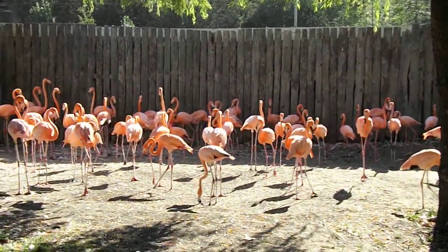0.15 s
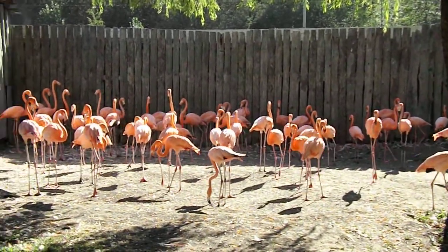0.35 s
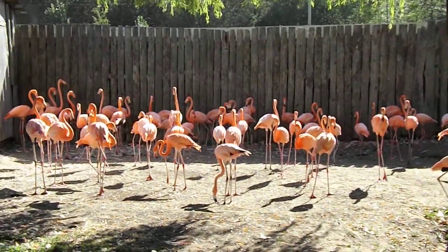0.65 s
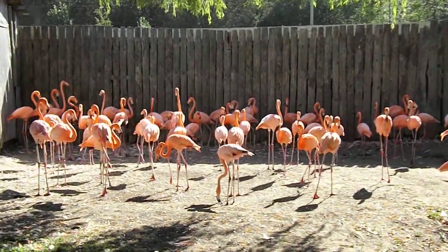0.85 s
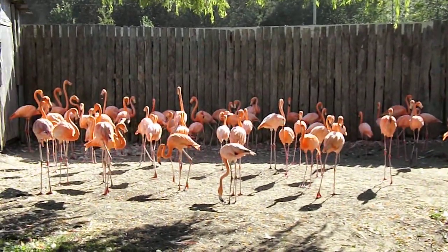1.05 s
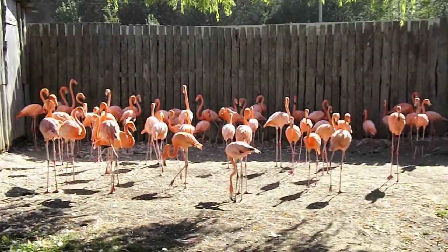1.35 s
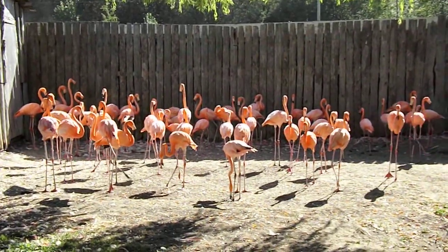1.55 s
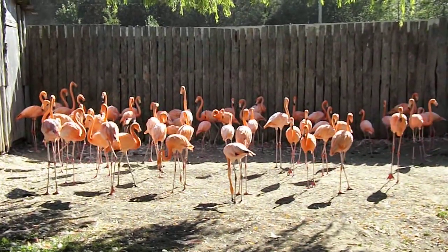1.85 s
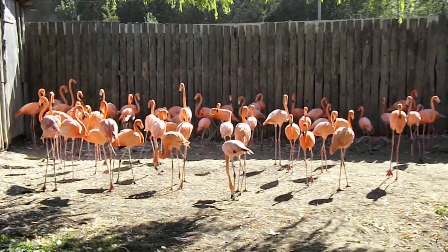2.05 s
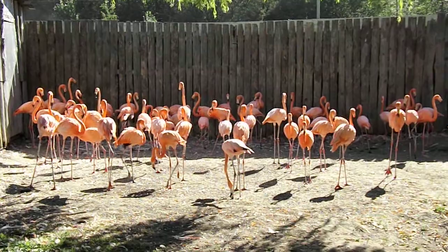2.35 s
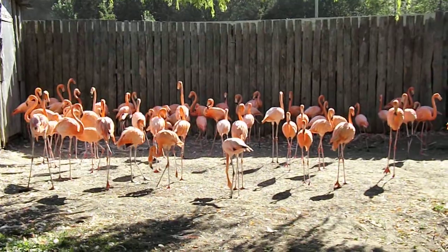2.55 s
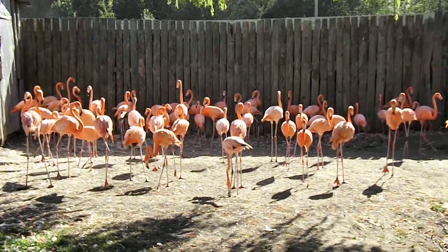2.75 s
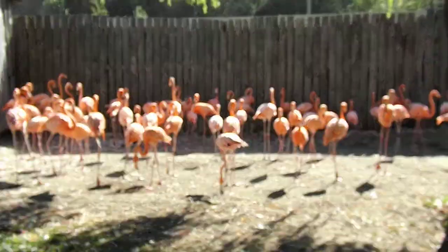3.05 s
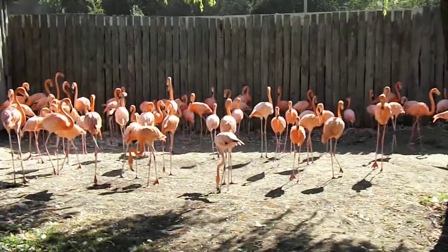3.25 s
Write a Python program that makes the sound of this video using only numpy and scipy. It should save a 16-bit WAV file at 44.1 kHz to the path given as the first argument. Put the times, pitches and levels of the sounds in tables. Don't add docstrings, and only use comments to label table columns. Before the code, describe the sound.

Flamingos call in a fenced yard. At 0.2 s a clear squeal starts with a knock, then nasal honks break into a rattle until 0.7. Four rough, low grunts come at 1.2-1.5, three closer, croaky ones at 2.1-2.5. Squeals and honks overlap from 2.6 to 3.1, ending with a dull grunt and bill clack at 3.2. Faint chirps, thin whistles, soft rumble, leaf hiss and dull echoes; mono.

```python
import sys
import numpy as np
from scipy import signal
from scipy.fft import rfft, irfft
from scipy.io import wavfile

SR = 44100
rng = np.random.default_rng(int(sys.argv[2]) if len(sys.argv) > 2 else 0)


def master(y):
    cut = np.clip(np.atleast_2d(y).T, -1, 1)
    pcm = np.round(cut * 32767)
    wavfile.write(sys.argv[1], SR, pcm.astype(np.int16))


def boost_factor(decibels):
    exponent = np.asarray(decibels, float) / 20
    return 10 ** exponent


N = 149940

# centre_hz, width_hz, level_db
THROAT_BACK = [(753, 200, -0.5), (1135, 230, 1), (1550, 275, -0.5), (2400, 450, 0), (3080, 600, 4.5),
               (3940, 370, -0.5), (4710, 1540, -2), (8880, 4000, 0.5)]


def rms_one(x):
    return x / np.sqrt(np.mean(x ** 2) + 1e-20)


def drift(rate_hz, size):
    r = np.exp(-2 * np.pi * rate_hz / SR)
    noise = rng.standard_normal(size + 4000)
    return rms_one(signal.lfilter([1], [1, -2 * r, r * r], noise)[4000:])


def short_drift(rate_hz, size):
    return drift(rate_hz, SR // 2)[:size]


def chance(size):
    return rng.standard_normal(SR // 2)[:size]


def lowpass(x, order, cut_hz):
    return signal.sosfilt(signal.butter(order, cut_hz, fs=SR, output="sos"), x)


def span(rows):
    s, *columns = np.transpose(rows)
    first = int(s[0] * SR)
    t = np.arange(first, first + int((s[-1] - s[0]) * SR)) / SR
    fade = np.clip(np.minimum(t - t[0], t[-1] - t) / 0.004, 0, 1)
    return [first, fade] + [np.interp(t, s, column) for column in columns]


def resonator(hz, width_hz):
    r = np.exp(-np.pi * width_hz / SR)
    return [(1 - r * r) / 2, 0, (r * r - 1) / 2], [1, -2 * r * np.cos(2 * np.pi * hz / SR), r * r]


def resonance(x, hz, width_hz):
    return signal.lfilter(*resonator(hz, width_hz), x)


def moving_resonance(x, hz, width_hz):
    block = 128
    out, state = np.zeros(len(x)), np.zeros((2, 2))
    for i in range(0, len(x), block):
        top, bottom = resonator(hz[i], width_hz)
        section = top + bottom
        out[i:i + block], state = signal.sosfilt([section, section], x[i:i + block], zi=state)
    return out / np.sqrt(width_hz)


def throat(x, table, opening):
    opening = np.clip(opening, 0, 1)

    def steep(hz, width):
        return resonance(resonance(x, hz, width), hz, width)

    out = 0
    for *hz, width, db in table:
        blend = (1 - opening) * steep(hz[0], width) + opening * steep(hz[-1], width)
        out = out + boost_factor(db) * blend / np.sqrt(width)
    return out


def sung_note(hz, orders, tilt_db, rasp_db):
    n = len(hz)
    waver, shimmer_db = 0.0023, 2
    phase = 2 * np.pi * np.cumsum(hz * (1 + waver * short_drift(39, n))) / SR
    tone = 0
    for k, db in orders:
        octaves = np.log2(k)
        shimmer = shimmer_db * octaves / 2 * short_drift(39, n)
        tone = tone + boost_factor(db + tilt_db * octaves + shimmer) * np.sin(k * phase + k * k)
    breath = throat(chance(n) * (1 + np.cos(phase)), THROAT_BACK, 0.5)
    return phase, np.sqrt(2) * tone + boost_factor(rasp_db) * rms_one(breath)


def squeals():
    # time_s, pitch_hz, level_db, second_partial_db, upper_partials_db
    clear_notes = [
        [(.222, 778, -46, -52, -53), (.232, 773, -37, -34, -47), (.246, 769, -36, -36.5, -33.5),
         (.28, 766.4, -36.5, -33.5, -30), (.293, 760, -42, -52, -33), (.301, 745, -43, -34.5, -39.5),
         (.318, 740, -31.5, -59, -37), (.335, 740, -55, -63, -52)],
        [(2.622, 796, -41, -61, -56), (2.632, 759.5, -37.5, -38.5, -57), (2.658, 769.7, -33, -29.5, -37.5),
         (2.686, 757, -40, -31.5, -42.5), (2.698, 744, -31.5, -55, -32.5), (2.708, 743, -32, -54, -39.5),
         (2.728, 703, -42.5, -58, -50), (2.76, 715, -43, -60, -58)],
        [(2.812, 789, -38, -53, -58), (2.826, 785, -36, -50, -53), (2.85, 763, -33.5, -29, -35.5),
         (2.872, 762.5, -38.5, -33.5, -49), (2.884, 742, -41, -50, -32), (2.892, 742, -27.5, -53, -42),
         (2.908, 704, -47, -62, -54), (2.94, 707, -52, -62, -53)],
    ]
    clear_orders = [(3, -10.5), (4, 1.5), (5, -14), (6, -31.5), (7, -27), (8, -34), (9, -37), (10, -34),
                    (11, -25), (12, -23.5), (13, -31)]
    # time_s, pitch_hz, level_db, tilt_db_per_octave
    far_notes = [
        [(.49, 740.5, -48.5, -16), (.54, 701, -43, -7.5), (.58, 712, -43.5, -4)],
        [(2.01, 767, -58.5, -16), (2.05, 779, -44.5, -22), (2.066, 825, -48, -14)],
    ]
    far_orders = [(1, 1.5), (2, -11), (3, 3.5), (4, 8), (5, 3)]
    rasp_db = -11
    gasp_size = int(0.032 * SR)
    out = np.zeros(N)
    for rows in clear_notes:
        i, fade, hz, db, second_db, upper_db = span(rows)
        orders = [(1, 0), (2, second_db - db)]
        orders += [(k, level_db + upper_db - db) for k, level_db in clear_orders]
        out[i:i + len(hz)] += fade * boost_factor(db) * sung_note(hz, orders, 0, rasp_db)[1]
        gasp = rms_one(resonance(chance(gasp_size), hz=3240, width_hz=230))
        out[i:i + gasp_size] += boost_factor(-40) * np.hanning(gasp_size) * gasp
    for rows in far_notes:
        i, fade, hz, db, tilt = span(rows)
        out[i:i + len(hz)] += fade * boost_factor(db) * sung_note(hz, far_orders, tilt, rasp_db)[1]
    return out


def honks():
    # time_s, second_partial_hz, level_db
    honk_notes = [
        [(.33, 881, -38.5), (.348, 905.4, -49.5), (.375, 929, -42.5), (.408, 1014, -39.5), (.425, 985.6, -44.5),
         (.484, 964.6, -42.5), (.51, 859, -47), (.545, 920, -44)],
        [(.55, 958, -47), (.57, 930, -43.5), (.602, 964.6, -40.5), (.62, 957.3, -42.5), (.636, 885, -50),
         (.67, 967, -46.5)],
        [(2.735, 880, -42.5), (2.758, 909, -43.5), (2.782, 935, -41), (2.806, 1008, -39), (2.834, 1017, -40.5),
         (2.856, 990, -53)],
        [(2.91, 869, -43.5), (2.944, 880, -42), (2.986, 942, -39), (3.026, 917, -40), (3.034, 908, -46),
         (3.042, 920, -59), (3.056, 923, -43), (3.07, 890, -58)],
    ]
    brightness = [0.37, 0.58, -0.22, -1.5]
    orders = [(1, -10), (2, 10.5), (3, -8), (4, -4), (5, 1), (6, -5.5), (7, -36), (8, -10.5), (9, -15.5),
              (10, -14.5)]
    # time_s, rattle share (0-1)
    rattle_curve = [
        (0.412, 0.13),
        (.43, 0.2),
        (.495, 1),
        (.52, 0.23),
        (.55, 0.08),
    ]
    rattle_sharpness = 1.84
    out = np.zeros(N)
    for rows, bright in zip(honk_notes, brightness):
        i, fade, hz, db = span(rows)
        rattle = np.interp((i + np.arange(len(hz))) / SR, *np.transpose(rattle_curve))
        tilt = bright + 0.8 * (db - db.max())
        phase, tone = sung_note(hz / 2, orders, tilt, rasp_db=-6.5)
        beat = np.exp(rattle_sharpness * np.clip(rattle, 0, 1) * (np.cos(phase / 3) - 0.6))
        out[i:i + len(hz)] += fade * boost_factor(db) * tone * beat
    return out


def grunts(table, voice, rough):
    onset_db, edge_db = -15.5, -20
    rate_sag, jitter = 0.06, 0.009
    out = np.zeros(N)
    for s, swell, fall, db, hz in table:
        i, fade, slack = span([(s, 1), (s + swell, 0), (s + swell + fall, 1)])
        n = len(fade)
        slack = slack ** 2.5
        rate = hz * (1 - rate_sag * slack + jitter * short_drift(60, n))
        cycles = np.cumsum(rate) / SR + 0.5
        strength = boost_factor(1 * chance(200))[cycles.astype(int)]
        steps = np.floor(cycles) - 0.6 * np.floor(cycles + 0.57)
        pulses = lowpass(np.diff(steps, prepend=0), 2, 4130)
        puffs = chance(n) * np.exp(-1.0 * (cycles % 1))
        source = np.sqrt(1 - rough) * rms_one(pulses) + np.sqrt(rough) * rms_one(puffs)
        t = (i + np.arange(n)) / SR
        effort_db = np.where(t < s + swell, onset_db, edge_db) * slack
        out[i:i + n] += fade * boost_factor(db + effort_db) * rms_one(voice(strength * source, t))
    return out


def near_throat(x, t):
    resonances = [(330, 350, 196, -18), (637, 596, 76, -7), (836, 920, 200, -1), (2450, 2347, 270, -5),
                  (3660, 3250, 215, 3), (3940, 3870, 1140, 0.5), (7040, 7800, 3200, 4)]
    # time_s, bill_open (0-1), low_mouth_hz, high_mouth_hz, high_mouth_db
    bill = [(2.07, 0.28, 1120, 2600, -3), (2.104, 0.3, 1140, 2580, -8), (2.14, 0.77, 1410, 2910, 6),
            (2.19, 0.32, 1520, 2900, 1.5), (2.23, 1, 1310, 2450, .1), (2.29, 0.96, 1450, 2400, 1.5),
            (2.36, 1, 1560, 2580, -1), (2.41, 0.49, 1150, 2400, 3), (2.46, 1, 1240, 2820, 1),
            (2.5, 0.93, 1230, 2690, 2), (2.54, 0.42, 1280, 2490, -2)]
    s, *columns = np.transpose(bill)
    opening, low_hz, high_hz, high_db = [np.interp(t, s, column) for column in columns]
    mouth = moving_resonance(x, low_hz, 350) + boost_factor(high_db) * moving_resonance(x, high_hz, 470)
    voice = throat(x, resonances, opening) + boost_factor(5) * mouth
    return voice - resonance(voice, hz=1900, width_hz=170)


def near_bird_grunts():
    # start_s, swell_s, fade_s, level_db, pulse_rate_hz
    near_calls = [
        (2.0755, 0.03, 0.13, -27.5, 117.6),
        (2.225, 0.12, 0.073, -29, 119.8),
        (2.405, .06, 0.074, -31.5, 116.5),
    ]
    return grunts(near_calls, near_throat, rough=0.42)


def second_bird_grunts():
    # start_s, swell_s, fade_s, level_db, pulse_rate_hz
    second_calls = [
        (1.184, 0.018, 0.062, -34.5, 96.85),
        (1.247, 0.016, 0.025, -43, 101.2),
        (1.306, 0.0703, 0.076, -32, 125.8),
        (1.449, 0.036, 0.04, -34, 120.6),
    ]
    # centre_hz, width_hz, level_db
    resonances = [(337, 130, -17.5), (780, 160, -7), (954, 263, 1), (1255, 150, -1.5), (1510, 310, 2),
                  (2450, 280, -5), (2957, 360, 5.5), (3320, 330, -2), (4660, 1670, -7.5), (6270, 280, -11),
                  (8600, 4200, 1.5)]
    return grunts(second_calls, lambda x, t: throat(x, resonances, 0), rough=0.62)


def back_grunts():
    # start_s, swell_s, fade_s, level_db, pulse_rate_hz
    back_calls = [
        (.32, 0.046, 0.053, -40.5, 154.3),
        (.37, 0.053, 0.14, -36, 161.2),
        (.5, 0.11, 0.05, -44.5, 150.5),
        (2.72, 0.13, 0.13, -38.5, 128),
        (2.9, 0.064, 0.14, -50, 113.4),
    ]
    dull_call = [
        (3.075, 0.054, 0.049, -43, 114.7),
    ]
    out = grunts(back_calls, lambda x, t: throat(x, THROAT_BACK, 0), rough=0.5)
    return out + grunts(dull_call, lambda x, t: throat(x, THROAT_BACK[:-4], 0), rough=0.5)


def clicks():
    # time_s, peak_db, pitch_hz, fall_by_60_db_s
    knocks = [
        (0.222, -20, 1014, 0.019),
        (1.178, -30, 1160, 0.013),
        (1.311, -32, 3030, .01),
        (2.0795, -19, 1140, 0.011),
        (2.622, -21.5, 980, 0.032),
        (3.19, -31, 2130, 0.025),
        (3.19, -36, 2470, 0.03),
    ]
    out, t = np.zeros(N), np.arange(SR // 10) / SR
    for s, db, hz, t60 in knocks:
        rise = 1 - np.exp(-t / 0.00042)
        out[int(s * SR):][:len(t)] += boost_factor(db - 60 * t / t60) * rise * np.sin(2 * np.pi * hz * t)
    return out


def whistles(table, octave_db, trill):
    trill_hz = 49.2
    out = np.zeros(N)
    for rows in table:
        i, fade, hz, db = span(rows)
        n = len(hz)
        phase = 2 * np.pi * np.cumsum(hz + 60 * drift(200, SR)[:n]) / SR
        throb = 1 + trill * np.sin(2 * np.pi * trill_hz * np.arange(n) / SR)
        octave = boost_factor(octave_db) * np.sin(2 * phase) * (hz < SR / 4.5)
        out[i:i + n] += fade * throb * boost_factor(db + 7) * (np.sin(phase) + octave)
    return out


def chirps_and_whistles():
    # time_s, pitch_hz, level_db
    chirp_notes = [
        [(1.045, 7650, -57), (1.076, 7620, -54), (1.125, 7700, -62), (1.17, 7600, -73)],
        [(1.83, 7270, -65), (1.88, 7350, -68), (1.9, 7670, -58.5), (1.98, 7460, -71)],
        [(2.745, 7200, -53), (2.77, 7170, -60), (2.792, 7330, -47.5), (2.84, 7400, -56)],
    ]
    # time_s, pitch_hz, level_db
    thin_notes = [
        [(.79, 10400, -67), (.91, 9800, -62), (.97, 10200, -68), (1.09, 11550, -66), (1.185, 11450, -62),
         (1.235, 12400, -69), (1.255, 11900, -66), (1.295, 12700, -67), (1.34, 11950, -66)],
        [(2.94, 10500, -68), (3.02, 10250, -65), (3.09, 10400, -63)],
    ]
    return whistles(chirp_notes, -23, 0.39) + whistles(thin_notes, -40, 0.18)


def yard(x):
    t60_s, level_db = 0.35, -17.5
    t = np.arange(SR // 2) / SR
    tail = rng.standard_normal(len(t)) * boost_factor(-60 * t / t60_s) * (t > 0.012)
    tail = lowpass(tail, 1, 4600)
    return boost_factor(level_db) * signal.fftconvolve(x, tail / np.sqrt(np.sum(tail ** 2)))[:N]


def background():
    # pitch_hz, level_db_per_hz
    noise_shape = [(30, -39), (60, -24), (86, -19), (96, -12), (160, -12.5), (500, -8.5), (900, 0.6),
                   (1300, -5), (2000, -7.5), (4000, -17), (6900, -21), (9800, -16), (12000, -26), (16000, -34)]
    # time_s, level_db
    strength = [(0, -51.5), (.7, -50), (1, -50.5), (1.6, -49), (2, -49.5), (2.6, -46), (3.4, -45)]
    # pitch_hz, level_db
    whines = [
        (9776, -69),
        (11714, -100),
    ]
    point_hz, point_db = np.array(noise_shape).T
    hz = np.fft.rfftfreq(N, 1 / SR) + 1
    shape = boost_factor(np.interp(np.log(hz), np.log(point_hz), point_db))
    noise = rms_one(irfft(rfft(rng.standard_normal(N)) * shape, N))
    t = np.arange(N) / SR
    level = np.interp(t, *np.transpose(strength))
    usual = np.mean(level)
    low = lowpass(noise, 2, 2500)
    out = boost_factor(level + 0.35 * drift(30, N)) * low + boost_factor(usual + 0.34 * (level - usual)) * (noise - low)
    for f, db in whines:
        out += boost_factor(db + 3 + 0.85 * drift(22, N)) * np.sin(2 * np.pi * f * t + 1.2 * drift(2.6, N))
    return out


def scene():
    flock = squeals() + honks() + near_bird_grunts() + second_bird_grunts() + back_grunts() + clicks()
    flock = signal.sosfilt(signal.butter(3, [300, 11000], "band", fs=SR, output="sos"), flock)
    small = chirps_and_whistles()
    delay = int(0.068 * SR)
    flock[delay:] += boost_factor(-23) * flock[:-delay]
    mono = flock + yard(flock + small) + small + background()
    return np.array([mono, mono])


def band_limit(x):
    return signal.sosfilt(signal.butter(12, 15610, fs=SR, output="sos"), x)


def record(dry):
    mix = np.array([np.roll(dry[0], 1), dry[1]])
    return band_limit(mix)


dry = scene()
out = record(dry)
master(out)
```